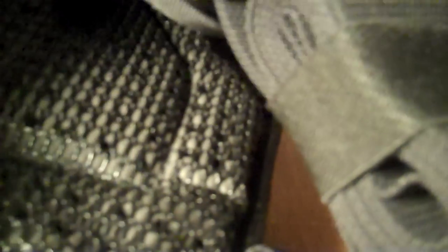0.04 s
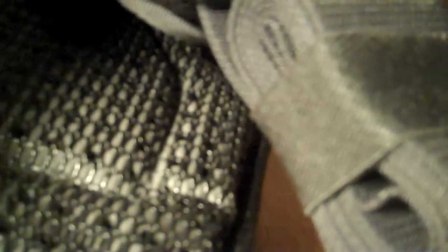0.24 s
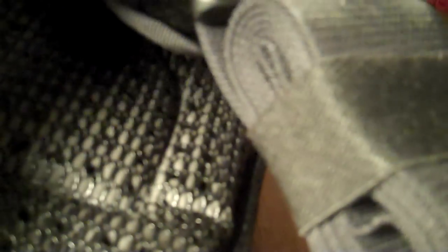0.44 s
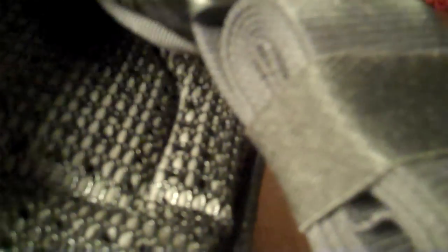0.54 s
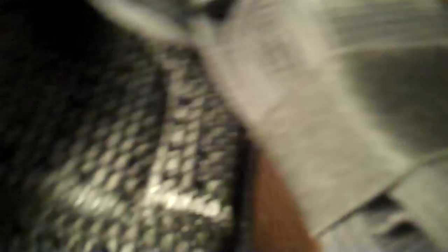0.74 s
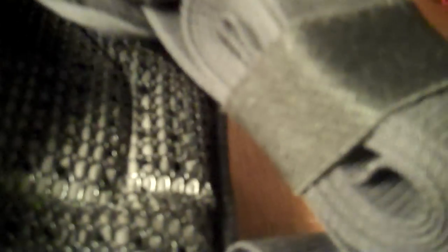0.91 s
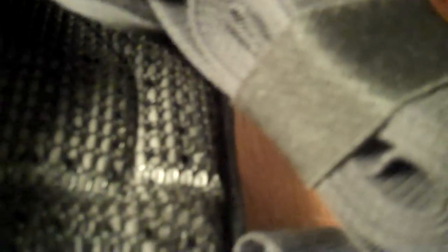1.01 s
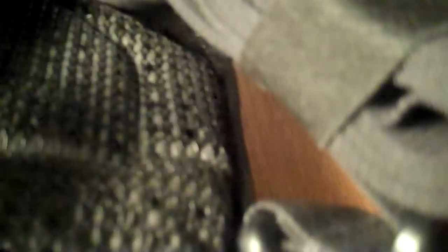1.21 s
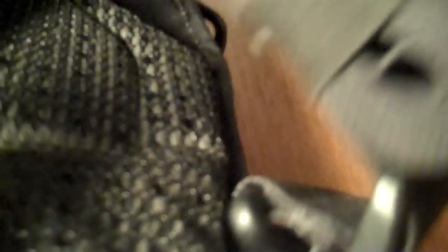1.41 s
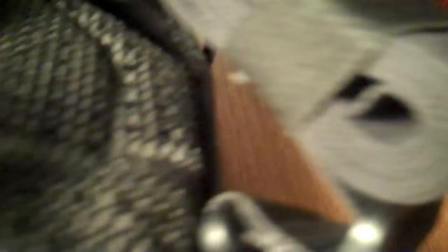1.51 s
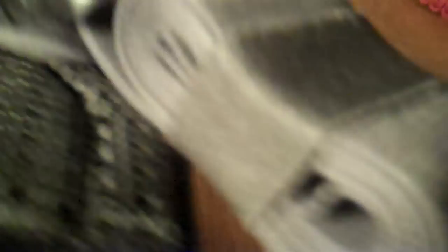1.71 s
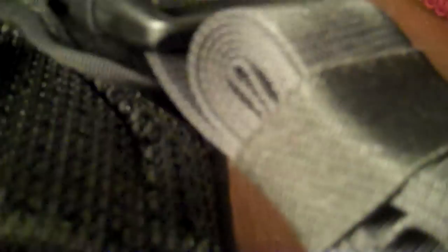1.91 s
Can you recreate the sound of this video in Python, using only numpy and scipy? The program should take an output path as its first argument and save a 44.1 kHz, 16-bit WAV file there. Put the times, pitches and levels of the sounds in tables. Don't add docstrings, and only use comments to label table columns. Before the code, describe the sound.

Stiff nylon bag crinkles and snaps in sharp dense bursts as hands turn it over, very close

```python
import sys
import numpy as np
from scipy import signal
from scipy.fft import rfft, irfft
from scipy.io import wavfile
from scipy.ndimage import uniform_filter1d, minimum_filter1d

SR = 44100
rng = np.random.default_rng(int(sys.argv[2]) if len(sys.argv) > 2 else 0)


def output_pcm(signal):
    pcm = np.clip(np.atleast_2d(signal).T, -1, 1) * 32767
    wavfile.write(sys.argv[1], SR, np.round(pcm).astype(np.int16))


def convert_level_to_amplitude(level_db):
    exponent = np.asarray(level_db, float) / 20
    return 10 ** exponent


N = 85995

# [t/s, level/dB, length/ms, extra cloth ring/dB]
PINCH_FOLDS = [(0.1321, -26, 0.053, 7), (0.1718, -21, 0.053, -6), (0.2048, -22, 0.56, -4),
               (0.2075, -22, 0.05, 6), (0.2181, -7.5, 0.044, -1.5), (0.243, -2.5, 0.058, -1),
               (0.259, -21, 0.34, -2), (0.2799, -6, 0.026, 1), (0.2864, -3, 0.057, 1),
               (0.329, -34, 0.2, -12), (0.3375, -4, 0.069, 1), (0.343, -23, 0.2, 3)]
CRUMPLE_FOLDS = [(0.4384, -3, 0.037, 7.5), (0.453, -10.5, 0.48, 5.5), (0.46, -9, 1.49, 3),
                 (0.4677, -20, 1.56, 7), (0.4785, -18.5, 0.53, 7), (0.482, -12, 0.63, 3),
                 (0.488, -5.5, 0.83, -7), (0.4914, -8, 0.6, 4.5), (0.4924, -10.5, 2.26, -1),
                 (0.4994, -10.5, 0.13, 6.5), (0.5027, -7.5, 3.16, 1), (0.5236, -17, 0.7, 0),
                 (0.5263, -5.5, 0.44, 7), (0.529, -10, 0.37, 4.5), (0.5338, -20, 0.36, 8),
                 (0.544, -29, 0.2, 0), (0.5507, -3.5, 0.83, 4), (0.56, -2.5, 2.8, -3),
                 (0.5667, -7, 0.23, 1), (0.569, -17.5, 3, 5), (0.575, -16, 0.38, 6), (0.581, -8.5, 2.3, 0),
                 (0.586, -10.5, 0.43, 7.5), (0.5928, -3, 0.57, -2), (0.5961, -11.5, 0.91, -1),
                 (0.6022, -5, 0.74, -7), (0.6081, -17, 0.3, 10), (0.612, -18, 0.36, 6),
                 (0.6152, -19.5, 0.84, 3)]
SHIFT_FOLDS = [(0.6461, -12, 0.57, -1.5), (0.6523, -24, 0.44, -7), (0.676, -43, 0.3, -6),
               (0.6872, -18.5, 0.2, 6), (0.6906, -21.5, 1.1, 8.5), (0.695, -18, 0.25, 0),
               (0.6987, -25, 0.3, 3), (0.7045, -18, 0.3, 5), (0.708, -12, 5.3, 2), (0.715, -17, 0.32, 4),
               (0.7362, -8.5, 0.33, -4.5), (0.7383, -19.5, 0.6, -10), (0.7638, -24, 2.6, -1),
               (0.7675, -9.5, 2.9, -9), (0.774, -14, 0.7, -19), (0.78, -24, 0.57, -12),
               (0.7852, -19, 0.34, -10), (0.794, -24.0, 1.2, 3), (0.8063, -28, 0.54, 0),
               (0.815, -30, 0.28, 0), (0.8184, -29, 0.53, 14)]
TWIST_FOLDS = [(0.8321, -10, 3.1, 2), (0.8368, -14, 0.5, 3), (0.8389, -11, 4.96, -3), (0.8456, -2, 2.78, 6),
               (0.8497, -10.5, 1.3, 4), (0.857, -1.5, 2.5, -9), (0.8615, -12, 0.6, 0),
               (0.8648, -10, 0.25, 0), (0.8689, -9.5, 1.66, -7), (0.8735, -6, 2.2, -5),
               (0.879, -17, 0.4, 0), (0.8817, -10, 1.7, 1), (0.896, -9.5, 0.48, 6),
               (0.9024, -19.5, 1.7, 15), (0.9095, -10, 0.73, -1), (0.9122, -20, 1.5, 6),
               (0.928, -20, 1.1, 13), (0.9339, -20.5, 0.78, 8), (0.9592, -28, 0.067, 16),
               (0.958, -31, 0.067, 14), (0.9683, -18, 0.31, 17), (0.972, -33, 0.8, 0), (0.981, -38, 0.8, 0),
               (0.91, -39, 0.27, 0)]
# [t/s, level/dB, length/ms]
SQUEEZE_FOLDS = [(1.0404, -23.5, 0.57), (1.0453, -10.5, 2.6), (1.0495, -8.5, 0.61), (1.0567, -9.5, 0.85),
                 (1.06, -13, 3.34), (1.0674, -9, 0.29), (1.0705, -7.5, 2.9), (1.076, -6, 0.77),
                 (1.0853, -0.5, 0.36), (1.0894, -6, 0.37), (1.0936, -7, 0.76), (1.115, -28, 0.44),
                 (1.1357, -14.5, 0.32), (1.1525, -24, 0.49), (1.1607, -11, 0.57), (1.1643, -17.5, 2.5),
                 (1.1717, -16.5, 0.42), (1.173, -26, 0.2), (1.1842, -16, 0.49), (1.1915, -19, 0.12)]
TURN_FOLDS = [(1.211, -17, 0.45), (1.2126, -8, 2.88), (1.217, -15, 0.45), (1.2199, -14, 0.23),
              (1.2262, -17.5, 1.3), (1.2352, -2.5, 5.25), (1.2434, -9.5, 0.17), (1.2494, -3.5, 0.59),
              (1.2524, -15, 0.28), (1.26, -16, 3.2), (1.265, -3.5, 1.37), (1.269, -13, 2), (1.272, -7, 0.6),
              (1.2757, -12.5, 0.39), (1.2781, -16.5, 2.9), (1.283, -22, 0.6), (1.3219, -26, 1.5)]
SETTLE_FOLDS = [(1.499, -34.5, 5), (1.6572, -18, 0.37), (1.7817, -22, 0.15), (1.7947, -21.5, 0.63),
                (1.8074, -25, 0.17), (1.8124, -27.5, 4.3), (1.8838, -20.5, 0.29), (1.9292, -24.5, 0.54),
                (1.9335, -22.5, 1.3)]
# [cloth ring/dB, hollow ring/dB, low push/dB, loose crackle/dB]
MOVEMENT_COLOURS = [
    (-4, -27, -60, -44),
    (-9, -25, -62, -16),
    (-4, -19.5, -59, -32),
    (-26, -24.5, -31, -23.5),
    (-16.5, -29.5, -50.5, -12),
    (-24, -26.5, -33, -15.5),
    (-6, -22, -56, -10),
]
# [t/s, peak level/dB, f/Hz]
KNOCKS = [
    (0.0008, -22.5, 330),
    (0.738, -18.5, 524),
    (0.77, -21.5, 296),
    (0.805, -18, 950),
    (1.368, -37, 995),
    (1.388, -36, 1100),
    (1.596, -23.5, 930),
    (1.657, -18, 1000),
    (1.6574, -3.5, 3610),
    (1.881, -25.5, 1404),
]
# [t/s, hiss level/dB, murmur level/dB, rumble level/dB]
SLIDE_LEVELS = [(0, -35.5, -46, -48.5), (.15, -41.5, -44, -65), (.55, -35.5, -46, -56.5),
                (.66, -47.5, -52, -49.5), (.755, -44, -47, -47), (.86, -37.5, -41, -54),
                (.945, -58, -46.5, -50), (1.01, -48.5, -46, -58), (1.19, -46, -64, -59),
                (1.275, -39, -29, -36.5), (1.32, -45, -63.5, -63.5), (1.42, -61, -56, -62),
                (1.5, -48, -57, -57), (1.61, -37.5, -40, -50.5), (1.72, -45, -41, -56),
                (1.95, -41.5, -37.5, -62)]
# [f/Hz, width/Hz, level/dB]
PORT_RINGS = [(5410, 1160, -1), (6390, 1520, 4), (7430, 883, 6.5), (8220, 4760, 1.5), (10300, 2000, -20),
              (12550, 2500, -9)]
CLOTH_RINGS = [(2777, 800, -2), (3410, 750, -2), (4540, 2440, -4)]
HOLLOW_RINGS = [(330, 220, -2.5), (552.6, 65, -4), (1100, 188, -3.5), (1526, 255, -5)]
MURMUR_RINGS = [(540, 340, -5.5), (878, 390, 2), (1140, 970, 7), (2560, 1600, 1.5)]
# [f/Hz, level/dB]
RIGHT_PORT_SHADE = [(1200, 0), (2800, -9), (5200, -7), (7000, -6), (9600, -4), (12500, -18)]

PORT_LAG_S, LAG_SPREAD_S = 5e-5, 1.5e-5
COLOUR_SPREAD_DB, SIDE_SPREAD_DB = 2.5, 1.5
BRIGHT_FLOOR_HZ = 1900
CEILING = 1.0


def amp_of(rows, column):
    times, levels = np.transpose(rows)[[0, column]]
    return convert_level_to_amplitude(np.interp(np.arange(N) / SR, times, levels))


def unit(x):
    return x / np.sqrt(np.mean(x ** 2) + 1e-20)


def cut(x, hz, kind, order=2):
    return signal.sosfilt(signal.butter(order, hz, kind, fs=SR, output="sos"), x + 1e-18)


def resonate(x, hz, width_hz):
    r = np.exp(-np.pi * width_hz / SR)
    w = 2 * np.pi * hz / SR
    return signal.lfilter([np.sin(w)], [1, -2 * r * np.cos(w), r * r], x + 1e-18)


def place(s, gain, pan_db, lag_s):
    out = np.zeros((2, N + 2))
    left = (s, gain * convert_level_to_amplitude(pan_db / 2))
    right = (s + lag_s, gain * convert_level_to_amplitude(-pan_db / 2))
    for side, (when, strength) in enumerate((left, right)):
        at = np.clip(when * SR, 0, N)
        i = at.astype(int)
        np.add.at(out[side], i, strength * (1 - at + i))
        np.add.at(out[side], i + 1, strength * (at - i))
    return out[:, :N]


def strike(rings, s, gain, pan_db, lag_s):
    out = 0
    for k, (hz, width, db) in enumerate(rings):
        z = rng.standard_normal((3, len(s)))
        strength = gain * convert_level_to_amplitude(db + COLOUR_SPREAD_DB * z[0])
        lag = lag_s * (1 + z[2] * 1500 / hz)
        clicks = place(s, strength, pan_db + SIDE_SPREAD_DB * z[1], lag)
        out = out + (-1) ** k * resonate(clicks, hz, width)
    return out


def drift(rate):
    r = np.exp(-2 * np.pi * rate / SR)
    noise = rng.standard_normal(N + 4000)
    return unit(signal.lfilter([1], [1, -2 * r, r * r], noise)[4000:])


def snaps():
    movements = (PINCH_FOLDS, CRUMPLE_FOLDS, SHIFT_FOLDS, TWIST_FOLDS, SQUEEZE_FOLDS, TURN_FOLDS, SETTLE_FOLDS)
    rows = []
    for folds, colour in zip(movements, MOVEMENT_COLOURS):
        for fold in folds:
            rows.append((tuple(fold) + (0,))[:4] + tuple(colour))
    rows = np.array(rows)
    s, db, ms, own_db, cloth_db, hollow_db, push_db, loose_db = rows.T[:, :, None]

    k = np.arange(32)
    in_break, after, before = k < 10, (k >= 10) & (k < 20), (k >= 20) & (k < 24)
    u = rng.random((len(rows), 32))
    z = rng.standard_normal((4, len(rows), 32))
    wait = -np.log(1 - u)
    count = np.clip(1 + 3.0 * ms, 1, 10)

    break_s = s + ms / 1000 * (k + u * (k > 0)) / count
    after_s = s + ms / 1000 + 0.002 * wait
    before_s = s - 0.001 * wait
    loose_s = s + ms / 2000 + 0.005 * (z[3] + 0.5)
    when = np.select([in_break, after, before], [break_s, after_s, before_s], loose_s).ravel()

    weak_db = -17 - 5 * wait
    level = np.select([in_break, after | before], [0 * wait, weak_db], loose_db - 6 * wait)
    level = level + 2.0 * rng.choice([1.0]) * z[0]
    used = np.where(in_break, np.clip(count - k, 0, 1), 1)
    gain = convert_level_to_amplitude(db + 3.5 + level) * used * np.sign(z[2])
    lag = (PORT_LAG_S + LAG_SPREAD_S * z[1]).ravel()

    ports = strike(PORT_RINGS, when, gain.ravel(), 0, lag)
    cloth_gain = gain * convert_level_to_amplitude(cloth_db + own_db + 0.24 * (db + 26.0))
    cloth = strike(CLOTH_RINGS, when, cloth_gain.ravel(), 0, lag)
    hollow = strike(HOLLOW_RINGS, when + 0.00184, (gain * convert_level_to_amplitude(hollow_db)).ravel(), 1.7, 1.83 * lag)

    size = gain * convert_level_to_amplitude(push_db + 39)
    alike = -0.47
    push = place(when, size.ravel(), 11.4, lag)
    separate = place(when, (size * np.sign(z[1])).ravel(), 7.6, lag)
    push[1] = alike * push[1] + np.sqrt(1 - alike ** 2) * separate[1]
    return cut(ports + cloth, BRIGHT_FLOOR_HZ, "high", order=4) + cut(hollow, 93, "high") + cut(push, [60, 515], "band")


def bumps():
    out = 0
    hollow_hz, hollow_width_hz = HOLLOW_RINGS[1][:2]
    for s, db, hz in KNOCKS:
        click = place(np.array([s]), 2 * convert_level_to_amplitude(db), 1.0, PORT_LAG_S)
        click = cut(click, [120, 5.9 * hz], "band")
        body = resonate(click, hz, 2.0 * hz / 4.3)
        hollow = convert_level_to_amplitude(-5) * min(1, 700 / hz) ** 2 * resonate(click, hollow_hz, hollow_width_hz)
        overtone = convert_level_to_amplitude(-0.5) * min(1, 2000 / hz) ** 2 * resonate(click, 2.43 * hz, 1.86 * hz)
        out = out + body - hollow + overtone
    return out


def slide():
    grains_per_s, flutter_db = 2500, 3
    s = rng.random(6000) * N / SR
    keep = rng.random(6000) < grains_per_s * N / SR / 6000
    size = keep * rng.choice([-1, 1], 6000)
    lag = PORT_LAG_S + 2 * LAG_SPREAD_S * rng.standard_normal(6000)
    grains = unit(place(s, size, 0.3, lag)) + convert_level_to_amplitude(-7) * rng.standard_normal((2, N))

    hiss = 0
    for k, (hz, width, db) in enumerate(PORT_RINGS + CLOTH_RINGS):
        gain = convert_level_to_amplitude(db - 1.1 * np.log2(hz / 5000))
        hiss = hiss + (-1) ** k * gain * resonate(grains, hz, 0.95 * width)
    murmur = 0
    for k, (hz, width, db) in enumerate(MURMUR_RINGS):
        gain = convert_level_to_amplitude(db + flutter_db * drift(21))
        murmur = murmur + (-1) ** k * gain * resonate(grains, hz, width)
    hiss = unit(cut(hiss, BRIGHT_FLOOR_HZ, "high"))
    murmur = unit(cut(murmur, 214, "high"))
    rumble = cut(grains * convert_level_to_amplitude([[4], [-4]]), [45, 333], "band")
    rumble = unit(rumble * convert_level_to_amplitude(flutter_db * drift(13)))

    hiss = hiss * amp_of(SLIDE_LEVELS, 1) * convert_level_to_amplitude(flutter_db * drift(28))
    return hiss + murmur * amp_of(SLIDE_LEVELS, 2) + rumble * amp_of(SLIDE_LEVELS, 3)


def scene():
    x = snaps() + bumps() + slide()
    fade_db = 5 * np.clip(1.4 - np.arange(N) / SR, 0, 2)
    return x + (convert_level_to_amplitude(fade_db) - 1) * cut(x, 10840, "high")


def drop_weak_treble(x, size=256):
    hz, _, z = signal.stft(x, SR, nperseg=size)
    power = uniform_filter1d(np.abs(z[:, 1:]) ** 2, size=3, axis=2)
    bands = power.reshape(2, -1, 8, power.shape[2]).mean(axis=2)
    loudest = bands.max(axis=1, keepdims=True)
    loudest = -minimum_filter1d(-loudest, size=15, axis=2)
    weak = np.repeat(bands < loudest * convert_level_to_amplitude(2 * -33), 8, axis=1)
    lost = weak & (hz[1:, None] > 3000)
    z[:, 1:] *= np.where(lost, convert_level_to_amplitude(-22), 1)
    return signal.istft(z, SR, nperseg=size)[1][:, :N]


def roll_off(x):
    return signal.sosfilt(signal.butter(12, 15470, fs=SR, output="sos"), x)


def record(dry):
    hz, db = np.transpose(RIGHT_PORT_SHADE)
    bins_hz = np.arange(N // 2 + 1) * SR / N
    shade = convert_level_to_amplitude(np.interp(np.log(bins_hz + 1), np.log(hz), db))
    x = np.array([dry[0], irfft(rfft(dry[1]) * shade, N)])
    x = np.clip(cut(x, 40, "high", order=1), -CEILING, CEILING)
    x = signal.sosfilt(signal.cheby1(8, 1, 14300, fs=SR, output="sos"), x)
    mix = np.clip(drop_weak_treble(x), -CEILING, CEILING)
    return roll_off(mix)


dry = scene()
out = record(dry)
output_pcm(out)
```